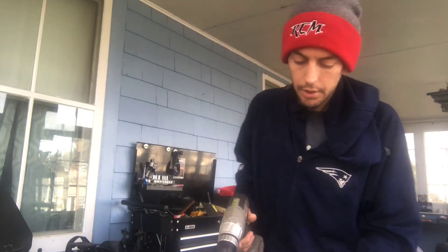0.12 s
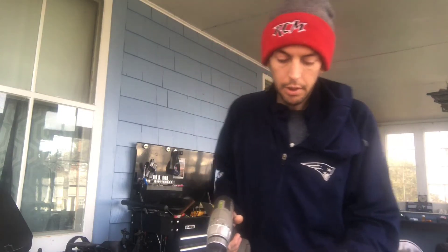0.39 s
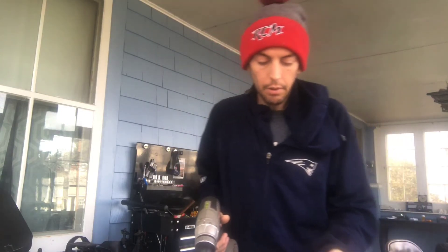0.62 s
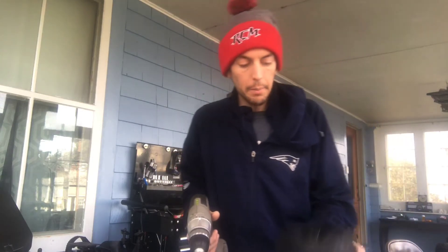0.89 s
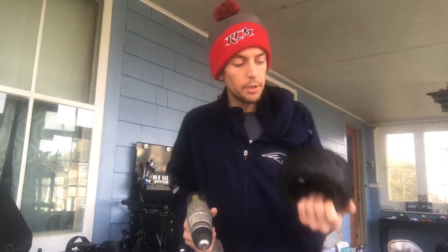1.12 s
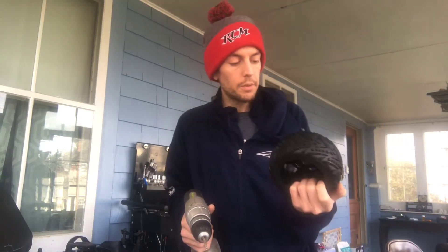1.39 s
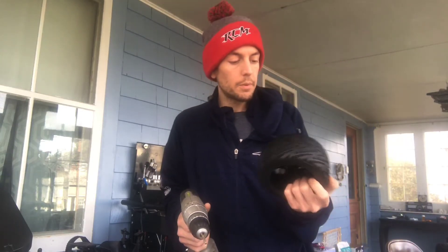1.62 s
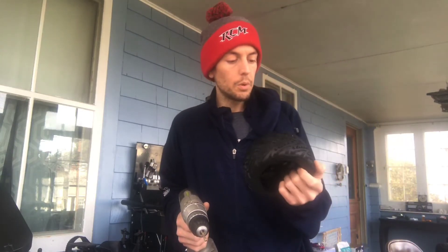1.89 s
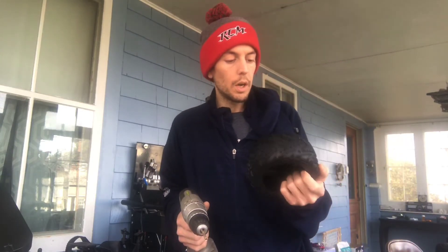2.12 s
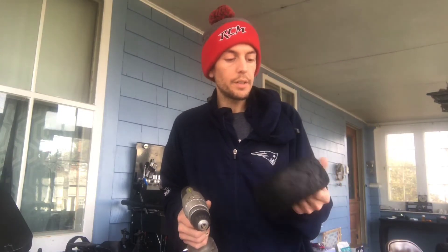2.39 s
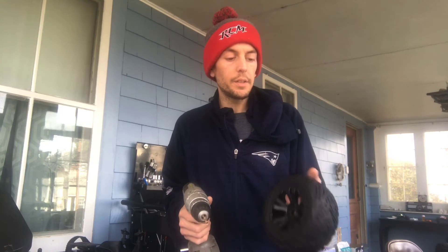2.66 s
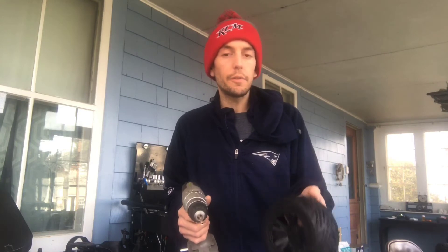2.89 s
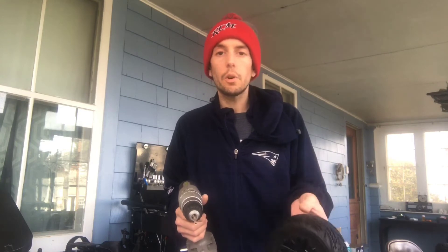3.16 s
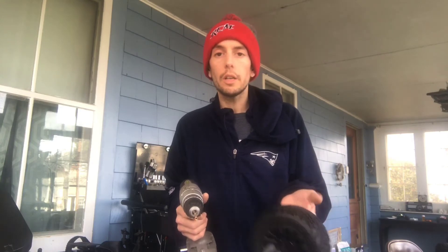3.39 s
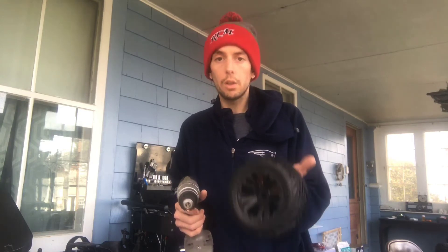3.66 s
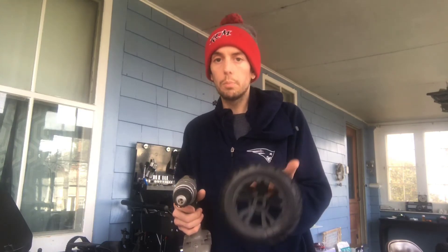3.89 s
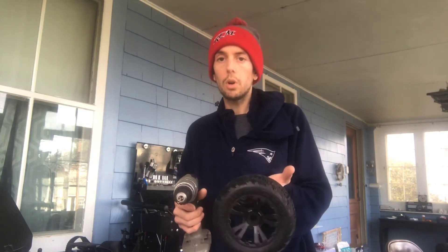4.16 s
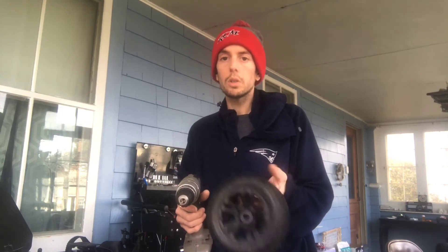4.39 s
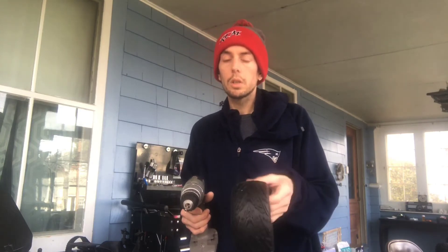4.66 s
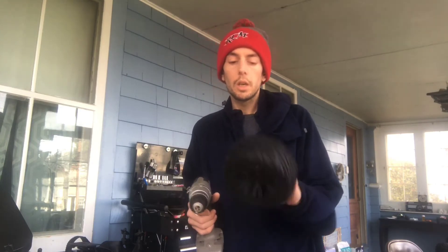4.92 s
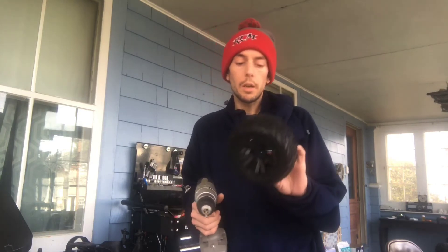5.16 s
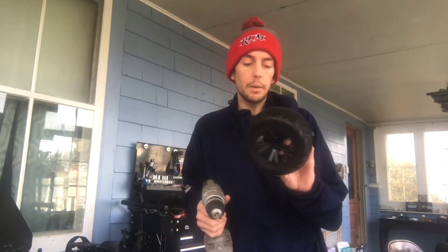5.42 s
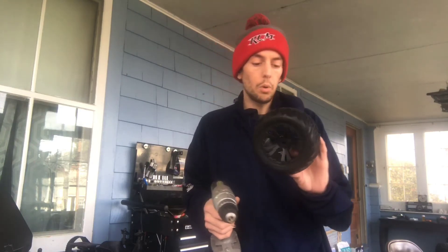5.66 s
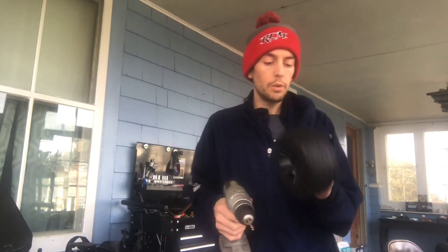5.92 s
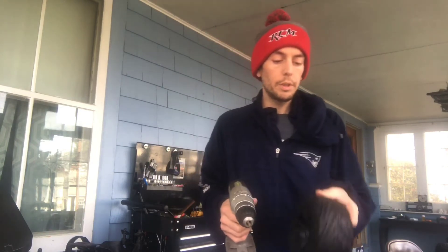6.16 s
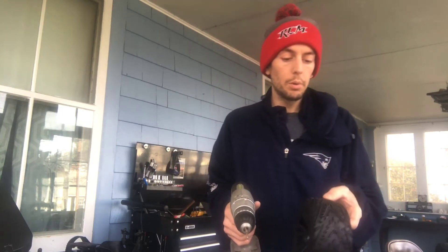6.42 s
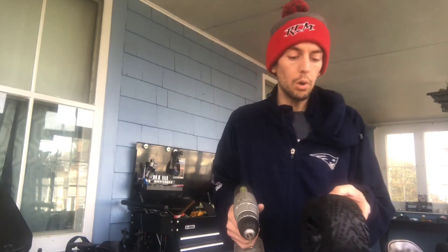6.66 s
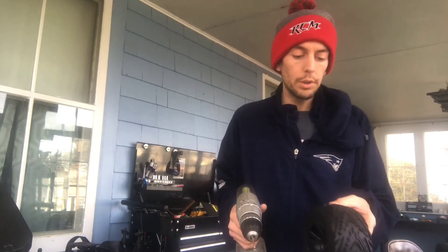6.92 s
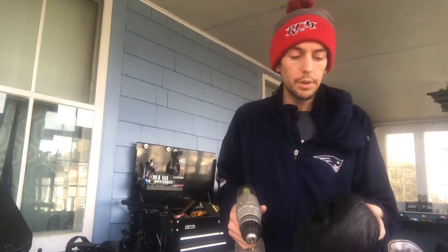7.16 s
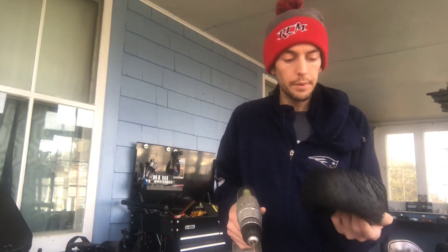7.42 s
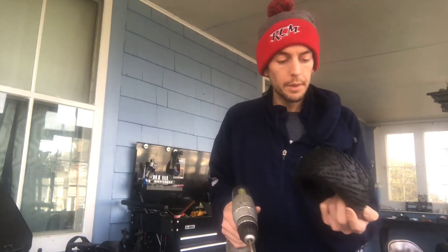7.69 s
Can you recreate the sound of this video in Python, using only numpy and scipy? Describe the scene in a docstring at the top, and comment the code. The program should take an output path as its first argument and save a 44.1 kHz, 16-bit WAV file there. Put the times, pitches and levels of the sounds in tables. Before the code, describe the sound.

Quiet outdoor air and low rumble sit beneath a nearby battery drill. First a brief electronic whine and quick rev, cut by a clicking brake; then a pause of almost two seconds. A second, longer run starts gritty at part speed, surges to a piercing steady whirr, and brakes fast. Dull board-like thumps surround the stop, with small knocks after it and a late rustle. Close mono sound with short, faint porch echoes.

```python
"""Low outdoor rumble, soft air and a far hum, made of filtered noise and sines, last from start to end.
A cordless drill runs twice on a covered porch, a short run and then a longer one, each ended by its brake.
Each run opens with a brief whine; then the rotor sings in sines on multiples of its speed over pulsing gear
noise, coloured by the plastic housing. Noise bursts tick as trigger, gears and brake act.
Around the second stop come soft ringing thumps and small noise knocks; last, a rustle of noise swells in."""
import sys
import numpy as np
from scipy import signal
from scipy.fft import rfft, irfft, next_fast_len
from scipy.io import wavfile

SR = 44100
rng = np.random.default_rng(int(sys.argv[2]) if len(sys.argv) > 2 else 0)


def generate_wav(signal):
    """Clip the signal to [-1, 1] and save it as 16-bit WAV at the path in sys.argv[1]."""
    frames = np.transpose(np.atleast_2d(signal))
    scaled = np.clip(frames, -1, 1) * 32767
    pcm = np.round(scaled).astype(np.int16)
    wavfile.write(sys.argv[1], SR, pcm)


def undo_db(level):
    """Turn decibels back into plain size, where 20 dB means ten times bigger."""
    steps = np.asarray(level, float) / 20
    return 10 ** steps


N = 343980
T = np.arange(N) / SR

FULL_HZ = 259  # full rotor speed, turns per second
# how far the drill is turned aside: (time [s], share turned aside [0 to 1])
TURNED_ASIDE = [(1.5, 0.3), (2.5, 0.01), (5.68, 0.01), (5.76, 0.83)]
# speed the trigger asks for in each run, sagging slowly with the battery: (time [s], speed [turns per s])
ASKED_SPEED = [
    [(.28, 0), (.3, 96), (.46, 138), (.585, 166), (.592, 263), (.965, 261), (.98, 234), (1.04, 217),
     (1.1, 103), (1.16, 0)],
    [(2.83, 0), (2.88, 70), (3.02, 149), (3.12, 146), (3.51, 165), (3.516, 265), (4, 259.9), (5.3, 258.5),
     (6.28, 255.8), (6.42, 260), (6.45, 215), (6.56, 110), (6.58, 0)],
]


def rms_one(x):
    """Scales a sound to an rms (average strength) of 1."""
    return x / np.sqrt(np.mean(x ** 2) + 1e-20)


def in_time(rows):
    """Draws straight lines between the rows of a curve: one value per sample for each column."""
    s, *columns = np.transpose(rows)
    return [np.interp(T, s, c) for c in columns]


def sounding(tables, fade_s=0.0018):
    """Gives 1 inside the time span of any table and 0 outside, with short fades."""
    return sum(np.clip(np.minimum(T - rows[0][0], rows[-1][0] - T) / fade_s, 0, 1) for rows in tables)


def at_hz(points, hz):
    """Reads the dB of a spectrum at a frequency, on a logarithmic frequency scale."""
    table_hz, table_db = np.array(points)[:, 0], np.array(points)[:, 1]
    return np.interp(np.log(hz + 1), np.log(table_hz), table_db)


def colour(x, db_at):
    """Filters with the given dB at each frequency; minimum phase, so nothing sounds before its cause."""
    size = next_fast_len(N + SR // 4)
    # folding the cepstrum (the transform of the log spectrum) forward gives minimum phase
    cepstrum = irfft(np.log(undo_db(db_at(np.linspace(0, SR / 2, 2049)))))
    cepstrum[1:2048] *= 2
    cepstrum[2049:] = 0
    impulse = irfft(np.exp(rfft(cepstrum)))
    return irfft(rfft(x, size) * rfft(impulse, size), size)[:N]


def noise(points, gain=1):
    """Makes noise of unit rms with a given spectrum, shaken by a gain before it is coloured."""
    return rms_one(colour(gain * rng.standard_normal(N), lambda hz: at_hz(points, hz)))


def drift(rate_hz):
    """Wanders at random with spread 1: noise smoothed twice, made at every 64th sample."""
    r = np.exp(-128 * np.pi * rate_hz / SR)
    slow = signal.lfilter([1], [1, -2 * r, r * r], rng.standard_normal(N // 64 + 2002))
    slow = slow[2000:]  # leave out the settling of the filter
    return np.interp(np.arange(N) / 64, np.arange(len(slow)), rms_one(slow))


def clicks(events):
    """Places one impulse for each (time [s], level [dB])."""
    out = np.zeros(N)
    for s, db in events:
        out[round(s * SR)] = undo_db(db)
    return out


def outdoors():
    """Adds uneven low rumble, smooth airy noise and a hum of sines wavering in level and phase."""
    # loudness of the rumble: (time [s], level [dB])
    rumble_level = [(0, -52), (1.2, -51), (3.7, -51), (5.1, -53.5), (5.5, -51.5), (7.8, -51)]
    # relative spectrum of the rumble: (frequency [Hz], density [dB per Hz])
    rumble_spectrum = [(8.8, -35.5), (15, -8), (38, 0), (92, -9), (123, -13), (175, -22.5), (199, -22),
                       (236, -20), (330, -36), (430, -77.5), (730, -120)]
    # relative spectrum of the air: (frequency [Hz], density [dB per Hz])
    air_spectrum = [(180, -32.5), (300, -10), (372, 0), (404, -12.5), (439, -8), (821, -4.5), (1050, -6.5),
                    (1810, -12), (2170, -12), (4420, -17), (5050, -19), (15500, -25)]
    # tones of the far hum, before its swell: (frequency [Hz], relative level [dB])
    hum_tones = [(33, -11), (49, 0), (70.5, -4), (99, -5.5)]
    # swell of the whole hum: (time [s], gain [dB])
    hum_swell = [(0, -64), (2.4, -60), (5.0, -58.5), (5.5, -53), (7.4, -45.5), (7.8, -55)]
    rumble = undo_db(in_time(rumble_level)[0] + 1.0 * drift(5.1)) * noise(rumble_spectrum)
    air = undo_db(-70 + 0.19 * drift(18)) * noise(air_spectrum)
    hum = np.zeros(N)
    for hz, db in hum_tones:
        level = undo_db(db + 2.96 * drift(2.06))
        hum += level * np.sin(2 * np.pi * (hz * T + 0.097 * drift(2.2)))
    return rumble + air + undo_db(in_time(hum_swell)[0]) * hum


def porch(x):
    """Echoes through eight feedback delays between wall, ceiling and floor, duller on every round."""
    t60_s, wall_cut_hz = 0.59, 6100  # time to fall by 60 dB before dulling; cut of the dulling filter
    size = next_fast_len(N + SR)
    z = np.exp(-2j * np.pi * np.arange(size // 2 + 1) / size)  # delay by one sample
    pole = np.exp(-2 * np.pi * wall_cut_hz / SR)
    dull = (1 - pole) / (1 - pole * z)
    echoes = 0
    for k, lag in enumerate([487, 613, 751, 887, 1031, 1171, 1327, 1481]):  # delays in samples
        loop = undo_db(-60 * lag / SR / t60_s) * dull * z ** lag
        echoes = echoes + (-1) ** k * loop / (1 - loop)
    return irfft(rfft(x, size) * echoes, size)[:N]


def rustle(lumpy_db):
    """Rubs unevenly: coloured noise with a randomly shaken level swells in."""
    # loudness of the rubbing, before a short fade-in: (time [s], level [dB])
    rubbing = [(7.63, -63), (7.7, -52), (7.735, -44.5), (7.8, -47)]
    # relative spectrum of the rubbing: (frequency [Hz], density [dB per Hz])
    rubbing_spectrum = [(120, -30), (200, 2), (253, -15), (379, -0.5), (516, -13), (666, -6), (1190, -10),
                        (1360, -20), (1510, -5), (2570, -5.5), (3980, -24), (5520, -4.5), (6160, -13),
                        (12800, -22.5), (15600, -27)]
    fade_in = np.clip((T - rubbing[0][0]) / 0.02, 0, 1)
    uneven = noise(rubbing_spectrum, undo_db(lumpy_db * drift(36)))
    return fade_in * undo_db(in_time(rubbing)[0]) * uneven


def thumps(contact_s):
    """Sets board modes ringing through a soft contact, with slightly new strengths each time."""
    # pushes on the boards: (time [s], relative level [dB])
    pushes = [(6.26, -32), (6.2977, -25), (6.5874, -25.5), (6.608, -32.5)]
    # ringing modes of the boards: (frequency [Hz], mean relative level [dB], time to fall by 60 dB [s])
    modes = [(122, 1.5, 0.065), (180, 6.5, 0.036), (248.7, -5, 0.23), (324, -3, 0.082), (470, -13.5, 0.042),
             (580, -12.5, 0.13), (669, -11, 0.15), (845, -8, 0.042)]
    out = np.zeros(N)
    at = [round(s * SR) for s, db in pushes]
    for k, (hz, db, t60_s) in enumerate(modes):
        push = (-1) ** k * clicks(pushes)  # neighbouring modes start in opposite directions
        push[at] *= undo_db(db + rng.normal(0, 1.5, len(at)))
        r, w = undo_db(-60 / (t60_s * SR)), 2 * np.pi * hz / SR
        out += signal.lfilter([0, np.sin(w)], [1, -2 * r * np.cos(w), r * r], push + 1e-18)
    soft = np.hanning(round(contact_s * SR))
    return undo_db(-5.0) * np.convolve(out, soft / soft.sum())[:N]


def knocks():
    """Makes each small knock a dying puff of noise, cut above its brightness."""
    # knocks near by: (time [s], noise level before the decay [dB], decay [s], brightness [Hz])
    puffs = [(6.583, -44, 0.013, 11860), (6.9, -57, 0.011, 2500), (6.9415, -47, 0.00062, 14030),
             (7.729, -52, .014, 2800)]
    out, t = np.zeros(N), T[:SR // 20]
    for s, db, decay_s, top_hz in puffs:
        band = signal.butter(2, [400, top_hz], "band", fs=SR, output="sos")
        hiss = rms_one(signal.sosfilt(band, rng.standard_normal(len(t))))
        out[round(s * SR):][:len(t)] += undo_db(db) * hiss * np.exp(-t / decay_s)
    return out


def housing(hz):
    """Gives the dB of the plastic housing at a frequency: a broad colour plus resonances."""
    # broad colour: (frequency [Hz], density [dB per Hz])
    broad = [(60, -22), (130, -28), (280, -14.5), (495, -30.5), (550, -17.5), (1000, -8.5), (1340, -10.5),
             (1450, -5.5), (2400, -4), (4000, 0.5), (4400, -6.5), (5900, -2.5), (7600, -10.5),
             (10300, -10.5), (12800, -3.5), (15500, -9)]
    # resonances and dips on top of it: (frequency [Hz], width [Hz], change [dB])
    resonances = [(850, 210, -1), (1475, 31, 9), (1254, 39, 0), (2010, 125, -2), (2315, 120, 1),
                  (2588, 38, 10.5), (2836, 25, 8.5), (3030, 40, 7), (3617, 42, 6.5), (3980, 430, 4),
                  (5610, 98, 9), (6320, 190, 5.5), (7000, 510, 5.5), (9310, 190, 5), (12600, 130, 15),
                  (11400, 450, -2), (13200, 170, 1)]
    peaks = sum(db / (1 + (2 * (hz - top_hz) / width) ** 2) for top_hz, width, db in resonances)
    return at_hz(broad, hz) + peaks


def ticks(decay_s):
    """Rings short noise bursts through the housing, for gear slack, trigger and brake."""
    # bursts, before an overall cut: (time [s], relative level [dB])
    bursts = [(0.3087, -44), (0.329, -52), (0.5994, -20), (1.051, -13), (2.8654, -35), (2.889, -25.5),
              (3.5194, -25), (6.4905, -14)]
    dying = np.convolve(clicks(bursts), np.exp(-T[:SR // 20] / decay_s))[:N]
    burst = dying * rng.standard_normal(N)
    one_click = colour(clicks([(0, 0.0045)]), housing)
    return undo_db(-14.5) * colour(burst, housing) / np.sqrt(np.sum(one_click ** 2))


def switching():
    """Whines as the trigger first bites: the speed control chops the current through the windings."""
    # one whine for each run, before a lift: (time [s], frequency [Hz], relative level [dB])
    whines = [
        [(0.283, 4158, -82), (0.295, 4160, -82), (0.323, 3879, -81), (0.335, 3940, -59)],
        [(2.832, 4100, -80), (2.842, 4174, -75), (2.872, 4130, -77), (2.89, 4100, -74)],
    ]
    # overtones of the whine: (multiple of its frequency, relative level [dB])
    overtones = [(1, 7), (2, -0.5), (3, -6)]
    hz, db = in_time(sum(map(list, whines), []))
    phase = 2 * np.pi * np.cumsum(hz) / SR
    tones = sum(undo_db(tone_db) * np.sin(k * phase) for k, tone_db in overtones)
    return sounding(whines) * undo_db(db + 10) * tones


def drive():
    """Lets the rotor follow the trigger with a lag; the gap between them is surge or easing off."""
    inertia_s, current_lag_s = 0.095, 0.018  # the current takes a moment to build
    asked, = in_time(ASKED_SPEED[0] + ASKED_SPEED[1])
    r = np.exp(-1 / (inertia_s * SR))
    speed = signal.lfilter([1 - r], [1, -r], asked)
    # full surge is 30 turns per s too slow, full easing 39 too fast
    surge = np.sqrt(np.clip((asked - speed) / 30, 0, 1))
    lag = np.exp(-1 / (current_lag_s * SR))
    surge = signal.lfilter([1 - lag], [1, -lag], surge)
    easing = np.clip((speed - asked) / 39, 0, 1)
    part = np.clip((FULL_HZ - asked) / 85, 0, 1)  # part trigger: how far below full speed is asked
    return speed, np.array([np.ones(N), part, surge * part, surge * (1 - part), easing])


def rattle(turns, treble_db, depth, split_hz):
    """Makes gear and brush noise that pulses with each turn, each half turn and each second turn."""
    beat = np.cos(2 * np.pi * turns) + 0.43 * np.cos(4 * np.pi * turns) + 0.97 * np.cos(np.pi * turns)
    grind = rms_one(colour((1 + depth * beat) * rng.standard_normal(N), housing))
    low = signal.sosfiltfilt(signal.butter(2, split_hz, fs=SR, output="sos"), grind)
    return low + undo_db(treble_db) * (grind - low)


def rotor_lines(speed, turns, load, waver_db, flutter_db):
    """Sings sines on multiples of the speed; each takes the housing colour of where its pitch stands."""
    # rotor lines with the drill held ahead: (multiple of the speed, relative level at full speed [dB])
    lines_ahead = [(1, -15), (2, -31), (3, -19), (4, -16), (5, -32), (6, -17), (7, -31), (8, -19), (9, -2),
                   (10, -20), (11, -17), (12, -27), (13, -27), (14, -10), (15, 1), (16, -15), (17, -32),
                   (18, -28), (19, -32), (20, -20), (21, -6), (22, -15), (23, -12), (24, -8), (25, -22),
                   (26, -24), (27, -7), (28, -33), (29, -36), (30, -21), (31, -21), (32, -37), (33, -22),
                   (34, -17), (35, -37), (36, -16), (37, -22), (38, -19), (39, -24), (40, -17), (41, -28),
                   (42, -25), (43, -14), (44, -30), (45, -17), (46, -13), (47, -13), (48, -14), (49, -14),
                   (50, -16), (51, -17), (52, -7), (53, -24), (54, -18), (55, -21), (56, -28), (57, -25),
                   (58, -21), (59, -26), (60, -23)]
    # the same lines turned aside: (multiple of the speed, relative level at full speed [dB])
    lines_aside = [(1, -18), (2, -32), (3, -23), (4, -20), (5, -32), (6, -20), (7, -23), (8, -29), (9, -5),
                   (10, -17), (11, -15), (12, -17), (13, -25), (14, -11), (15, 0), (16, -15), (17, -22),
                   (18, -24), (19, -23), (20, -22), (21, -16), (22, -4), (23, -14), (24, -13), (25, -23),
                   (26, -21), (27, -13), (28, -23), (29, -32), (30, -17), (31, -20), (32, -37), (33, -22),
                   (34, -25), (35, -28), (36, -17), (37, -18), (38, -20), (39, -23), (40, -18), (41, -39),
                   (42, -25), (43, -15), (44, -22), (45, -13), (46, -17), (47, -15), (48, -21), (49, -8),
                   (50, -11), (51, -15), (52, -17), (53, -7), (54, -23), (55, -27), (56, -31), (57, -28),
                   (58, -29), (59, -20), (60, -22)]
    # lines of the slower planet gears: (multiple of the speed, level ahead [dB], level aside [dB])
    planet_lines = [(5.5, -18, -19), (8.5, -15, -11), (10.5, -16, -18), (12.5, -17, -13), (13.5, -12, -16),
                    (15.25, -13, -20), (15.5, -15, -12), (18.5, -18, -17), (29.5, -22, -26)]
    # The next five say how lines answer the drive. Columns of each: (always [dB], at part trigger [dB],
    # surging at part trigger [dB], surging at full trigger [dB], easing off [dB])
    # basic tone of the commutator, the rotor's switching contacts
    commutator_answer = (1.5, 2, -4.5, 14, 3)
    # odd overtones of the commutator, same columns
    odd_answer = (0, -3.5, -11, -7, -12)
    # even overtones of the commutator, same columns
    even_answer = (0, 12, -6.5, 4.5, -10)
    # tooth mesh, same columns
    mesh_answer = (1.5, -7.5, 4.5, -8, -13)
    # all other lines, same columns
    other_answer = (1, -7.5, -11.5, -1, 0)
    commutator, mesh, throb_line = 3, 9, 22  # multiples of the rotor speed
    gear_ratio, throb_s = 36, 5.83  # rotor turns per chuck turn; time of one dip
    step = slice(None, None, 64)  # levels are worked out at every 64th sample
    aside = in_time(TURNED_ASIDE)[0][step]
    answers = [commutator_answer, even_answer, odd_answer, mesh_answer, other_answer]
    commutator_db, even_db, odd_db, mesh_db, other_db = np.array(answers) @ load[:, step]
    own = {commutator: commutator_db, 2 * commutator: even_db, 4 * commutator: even_db, mesh: mesh_db}
    own.update({k * commutator: odd_db for k in (5, 7, 9)})
    # one line dips once per chuck turn, deeper the more the drill is turned aside
    chuck = (turns - np.interp(throb_s, T, turns))[step] / gear_ratio
    own[throb_line] = other_db - 18 * aside * np.cos(np.pi * chuck) ** 8
    _, part, _, full_surge, easing = load[:, step]
    rough = 1 + 3.5 * (part + full_surge)  # lines break up at part trigger and in a surge
    blur_db = -0.18 * (full_surge ** 2 + easing)  # per multiple: surge and easing wash out the high lines
    rows = [(k, a, b) for (k, a), (_, b) in zip(lines_ahead, lines_aside)] + planet_lines
    out = np.zeros(N)
    for k, ahead_db, aside_db in rows:
        db = ahead_db + (aside_db - ahead_db) * aside + 0.11 * k  # high lines stand a little further out
        db = db + housing(k * speed[step]) - housing(k * FULL_HZ)
        db = db + own.get(k, other_db) + blur_db * k
        db = db + waver_db * drift(0.8)[step] + rough * flutter_db * drift(11)[step]
        out += np.interp(T, T[step], undo_db(db)) * np.sin(2 * np.pi * (k * turns + rng.random()))
    return np.sqrt(2) * out


def drill():
    """Runs the motor: speed and load make lines and rattle rise together, and the brake kills both."""
    # rattle against speed: (speed [turns per s], rattle level [dB], treble relative to the rattle [dB])
    rattle_law = [(15, -69, -7), (29.7, -46, -12.5), (80, -34.5, -13), (138, -36, -3.5), (165.5, -34, -1.5),
                  (217, -32, -0.5), (278.6, -32.5, -3)]
    # changes in each run: (rattle level [dB], treble [dB], time the brake bites [s])
    runs = [(0, 1.5, 1.063), (0.46, 1, 6.49)]
    speed, load = drive()
    turns = np.cumsum(speed) / SR
    full_surge, easing = load[3], load[4]
    at, law_db, law_treble_db = np.transpose(rattle_law)
    second = (T > ASKED_SPEED[1][0][0]).astype(int)  # 0 in the first run, 1 in the second
    run_db, bright_db, brake_s = np.transpose(runs)[:, second]
    braked_s = np.maximum(T - brake_s, 0)
    rattle_db = np.interp(speed, at, law_db) + run_db - 0.5 * full_surge ** 2 + 2.5 * easing
    rattle_db = rattle_db + 2 * np.exp(-((T - brake_s) / 0.013) ** 2)  # flares as the brake bites
    rattle_db = rattle_db - 300 * braked_s + 0.36 * drift(18)
    treble_db = np.interp(speed, at, law_treble_db) + bright_db - 4 * easing - 58 * braked_s
    treble_db = treble_db - 0.5 * in_time(TURNED_ASIDE)[0]  # turned aside, the rattle is duller
    full_speed_db = np.median(rattle_db[speed > 0.98 * FULL_HZ])
    # the lines follow the rattle, but die faster under the brake
    lines_db = -41.5 + rattle_db - full_speed_db - 250 * braked_s
    lines = undo_db(lines_db) * rotor_lines(speed, turns, load, waver_db=1.0, flutter_db=1.2)
    grind = undo_db(rattle_db) * rattle(turns, treble_db, depth=0.087, split_hz=3840)
    return sounding(ASKED_SPEED) * (lines + grind)


def scene():
    """Mixes near sounds, heard directly and off the porch, with the outdoors; both channels are alike."""
    near = drill() + switching() + ticks(decay_s=0.0015) + knocks()
    near = near + thumps(contact_s=0.0012) + rustle(lumpy_db=2.5)
    return np.tile(near + undo_db(-22.5) * porch(near) + outdoors(), (2, 1))


def top_cut(x):
    """Nothing passes above the cut-off."""
    return signal.sosfilt(signal.butter(12, 15760, fs=SR, output="sos"), x)


def record(dry):
    """Takes the finished mix, a single microphone's sound in both channels."""
    return top_cut(dry)


dry = scene()
out = record(dry)
generate_wav(out)
```